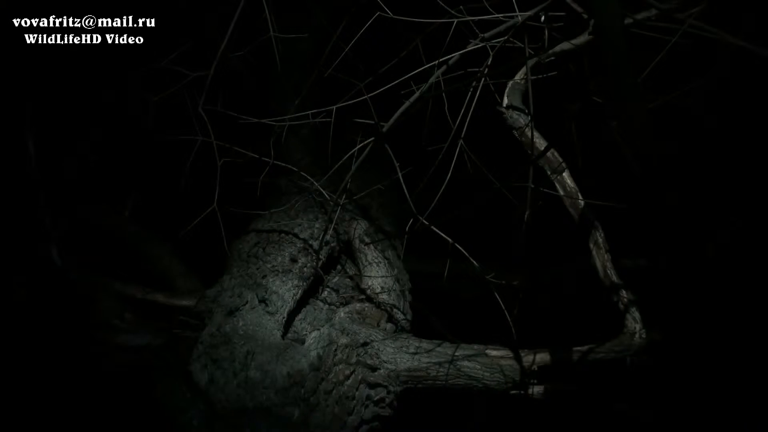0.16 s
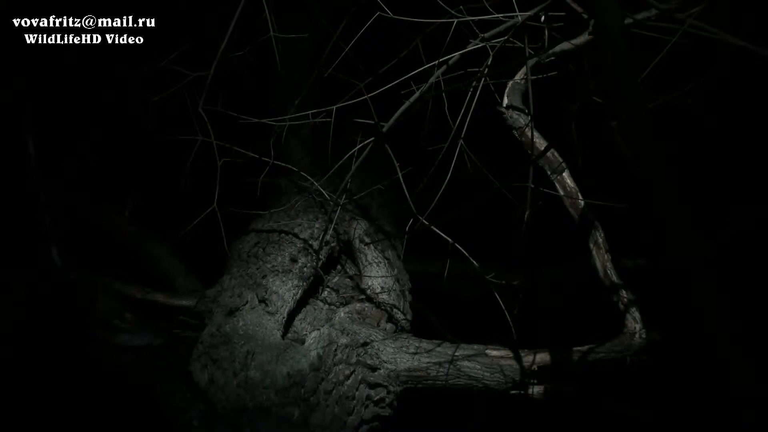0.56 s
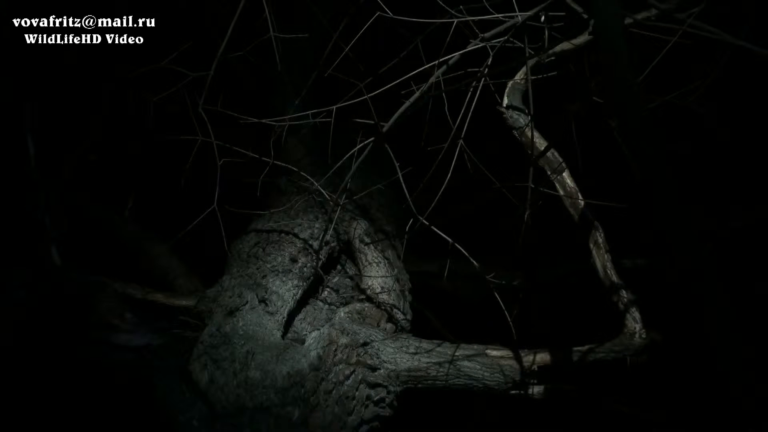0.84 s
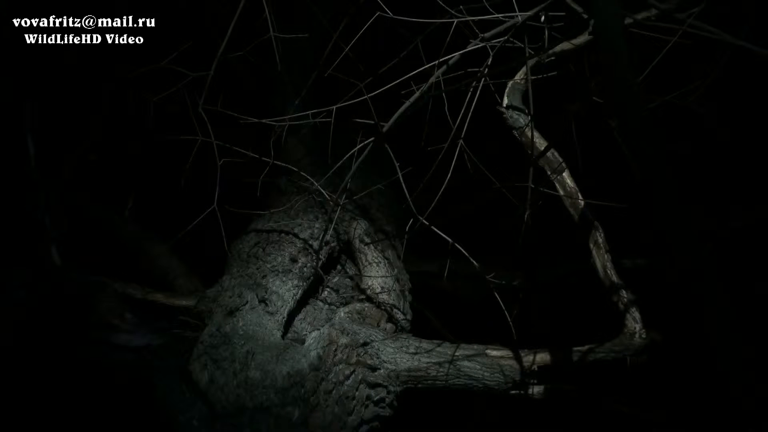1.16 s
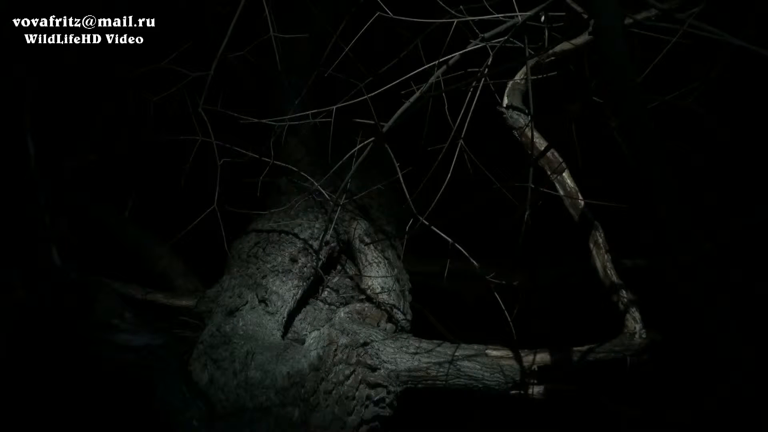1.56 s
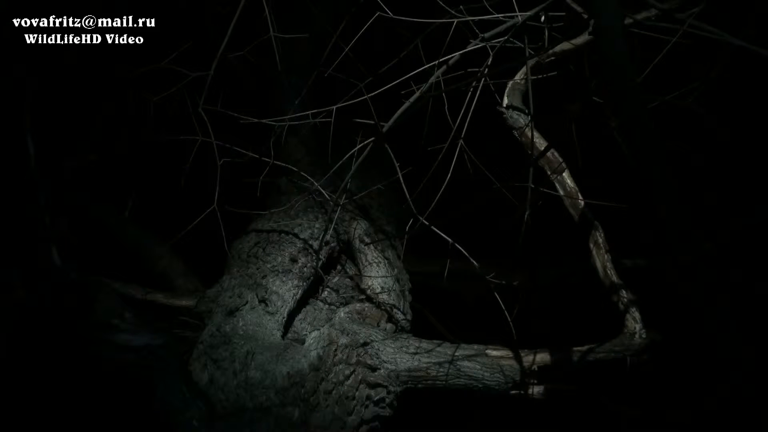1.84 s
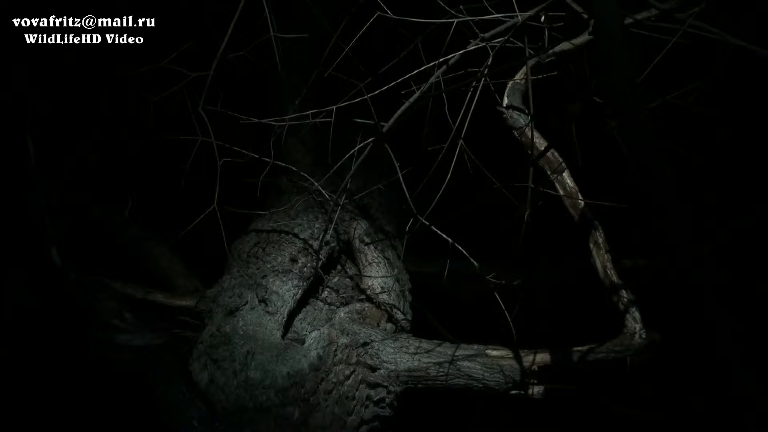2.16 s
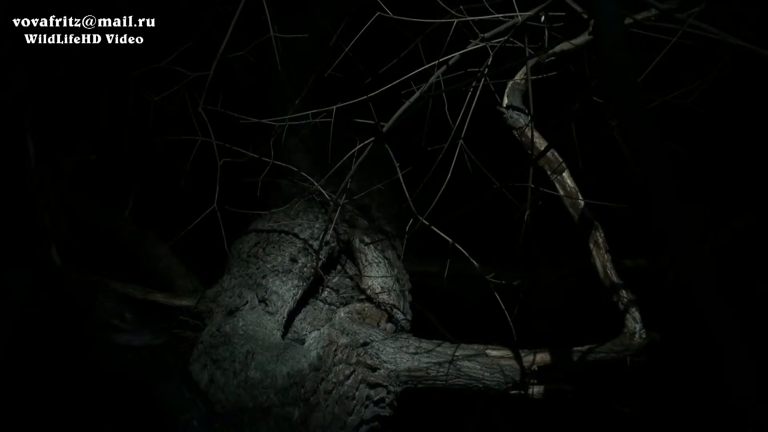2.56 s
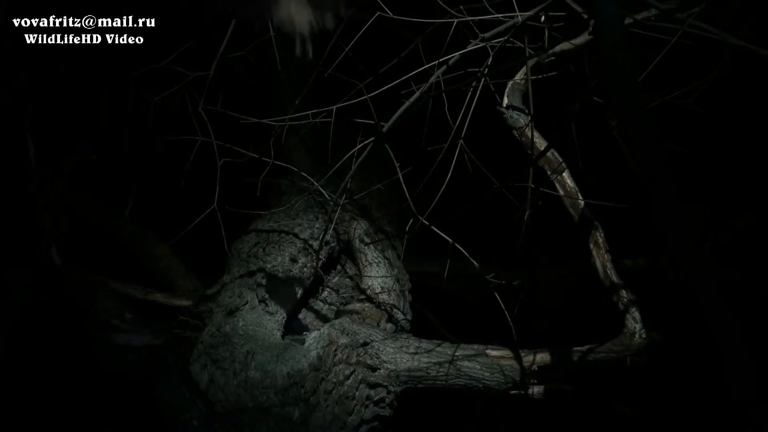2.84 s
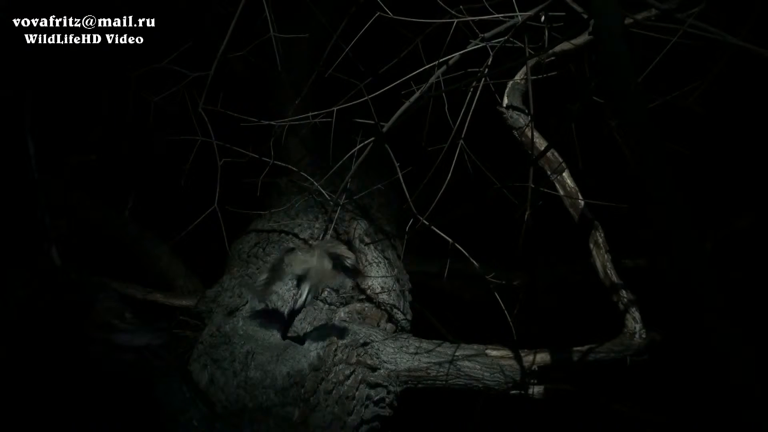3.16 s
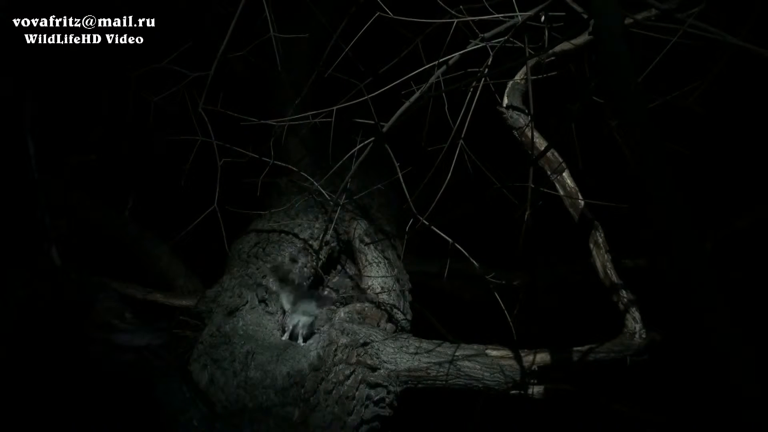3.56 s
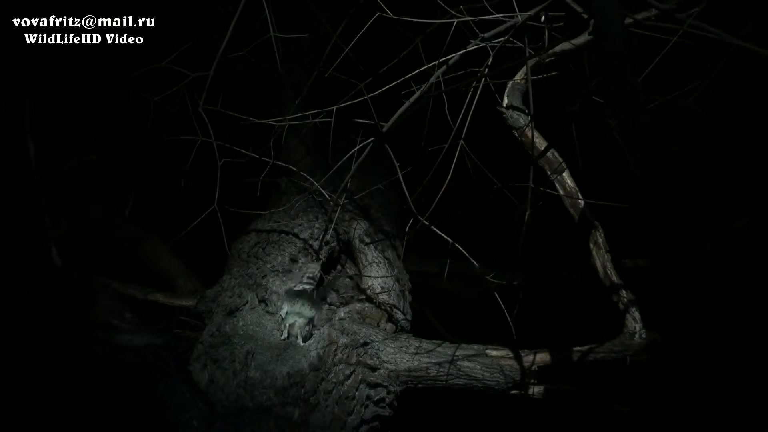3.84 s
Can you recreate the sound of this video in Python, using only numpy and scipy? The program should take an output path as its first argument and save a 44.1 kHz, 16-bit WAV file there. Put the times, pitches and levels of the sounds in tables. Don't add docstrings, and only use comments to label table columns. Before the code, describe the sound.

Owl ke-wick calls, one far and one near, with high whistled squeaks in a quiet night wood.

```python
import sys
import numpy as np
from scipy import signal
from scipy.fft import rfft, irfft, next_fast_len
from scipy.io import wavfile
from scipy.ndimage import uniform_filter1d, map_coordinates

SR = 44100
rng = np.random.default_rng(int(sys.argv[2]) if len(sys.argv) > 2 else 0)


def master(y):
    cut = np.clip(np.atleast_2d(y).T, -1, 1)
    pcm = np.round(cut * 32767)
    wavfile.write(sys.argv[1], SR, pcm.astype(np.int16))


def to_linear_factor(level_db):
    exponent = np.asarray(level_db, float) / 20
    return 10 ** exponent


N = 176400

# (time [s], pitch [Hz], level [dB], beak opening [0 shut, 1 open, may go beyond], hoarseness [0-1])
KE_FAR = [(.36, 978, -61, -.3, 0.74), (.38, 957, -69, -.3, 0.7), (.44, 982.6, -67.5, -.4, 0.93),
          (0.494, 1004, -63, -.3, 0.75)]
WICK_FAR = [(0.506, 1133, -52.5, 0.68, .1), (0.531, 1196, -53, .9, .05), (.56, 1269, -56.5, .9, .05),
            (0.579, 1334, -50, 0.73, .05), (.592, 1257, -57.5, 1.2, .1), (0.604, 1122, -47, 0.98, 0.05),
            (0.616, 1142, -57, 1.1, .1), (.625, 1110, -80, 1.1, .1)]
KE_NEAR = [(2.4705, 1260, -70, 1.1, .1), (2.4735, 1175, -46, 1.15, 0.06), (2.491, 1240, -48, 1.1, 0.12),
           (2.5, 1030, -50, 0.15, 0.08), (2.529, 990, -52.5, 0.05, 0.1), (2.552, 915, -50.5, 0.03, .12),
           (2.593, 975, -51, .1, .3), (2.635, 1051, -48, 0.34, 0.75), (2.651, 1160, -42, 0.5, 0.41)]
WICK_NEAR = [(2.661, 1055, -41.5, 1, 0.14), (2.667, 1164, -36.5, 0.58, 0.1), (2.68, 1268, -41.5, 1.5, .05),
             (2.714, 1328, -39.5, 1.6, 0.018), (2.733, 1264, -40.5, 1.25, 0.073),
             (2.743, 1165, -40.5, 0.91, 0.054), (2.755, 1083, -40, 0.35, 0.066)]
CATCH_NEAR = [(2.763, 1130, -47, 0.64, 0.33), (2.776, 1180, -42, 0.56, 0.21), (2.782, 1230, -68, .3, 0.33),
              (2.795, 1166, -75, .2, .4)]
KE_LAST = [(3.791, 986, -82, -.5, .6), (3.812, 922.7, -64.5, -0.54, 1), (3.91, 930, -63, -.5, 1),
           (4.0, 989, -68, -0.54, .6)]
# (left over right [dB], left lag [us], overtone loss [dB per octave])
OWL_PLACE = [
    (8, -36, -2.5),
    (4, 18.5, 0),
    (4, 46, -2),
]
# (frequency [Hz], gain [dB])
LEAVES = [
    [(1200, 0), (2400, 4), (3700, 0), (4600, -1), (5200, 8), (6300, -2), (7000, 1), (8000, 11)],
    [(1200, 0)],
    [(1200, 0)],
]
# (frequency [Hz], gain [dB])
BEAK_SHUT = [(1000, 3), (2000, -15), (3000, -10), (3900, -15), (5000, -27), (7000, -13), (8300, -20.5),
             (10000, -34)]
BEAK_OPEN = [(1200, -2.5), (2500, -7.5), (3750, -3.5), (4800, -16), (6700, -12), (7800, -18.5), (9300, -27),
             (10400, -37)]
OWL_JITTER, OWL_JITTER_HZ = 1.8, 260
FLUTTER_HZ, FLUTTER_DB, RASP_DB = 165, 2.5, 6.5

# (time [s], pitch [Hz], level [dB], hoarseness [0-1])
SQUEAK_A = [(.985, 7420, -82, .4), (.995, 7530, -71, .3), (1.01, 7075, -73, 0.5), (1.035, 7400, -66.5, 0.5),
            (1.09, 7350, -74, .5), (1.125, 6770, -76, .5), (1.17, 7300, -73.5, .5)]
SQUEAK_B = [(1.908, 6900, -72, .15), (1.922, 6650, -57, .1), (1.944, 5800, -55, .12),
            (1.958, 5600, -72, .6), (2.0, 5450, -68, .5), (2.018, 5850, -56, .2), (2.05, 7000, -57, .25),
            (2.074, 7550, -57, .35), (2.1, 6100, -62, .4)]
SQUEAK_C = [(3.425, 7250, -67, .2), (3.448, 6600, -57, .2), (3.475, 5750, -62, .3), (3.505, 5400, -63, .45),
            (3.545, 5800, -58, 0.25), (3.575, 6800, -54, .1), (3.6, 6850, -56, .05), (3.615, 6880, -63, .1),
            (3.63, 6900, -89, .1)]
# (time [s], level [dB], top pitch [Hz], hold level [dB])
CHIPS = [
    (.828, -78, 7300, -95),
    (1.812, -62, 7200, -76),
    (3.334, -56, 7500, -71),
]
FLICK_S, FLICK_DROP, CHIP_HOLD_S = .018, .7, .07
# (start [s], peak [s], end [s], pitch [Hz], peak level [dB])
HELD = [
    (1.94, 2.095, 2.28, 7050, -60),
    (3.46, 3.6, 3.7, 6880, -61),
]
HELD_HOARSE = [.75, .15]
HELD_RISE = [.955, 1.02]
HELD_START_DB, HELD_END_DB = -9, -12
# (frequency [Hz], gain [dB])
WHEEZE = [(1800, -30), (3100, 0), (4300, -5), (6000, 4), (7600, -3), (9000, -30)]
WHEEZE_DB, UNDERTONE_DB, SQUEAK_PAN_DB = -7.5, -6, -.5
SQUEAK_JITTER, SQUEAK_JITTER_HZ = 1.8, 600

# (time [s], level [dB])
TICKS = [
    (2.989, -58),
    (3.732, -62),
    (3.804, -58.5),
]
# (frequency [Hz], gain [dB])
BARK = [(500, 2), (2000, 11), (7000, 6), (14000, -7.5)]
TICK_S = 0.035

# (delay [s], level [dB])
GROUND = [(.004, -14), (.009, -10), (.016, -16)]
# (frequency [Hz], t60 [s])
WOOD = [(800, 0.6), (3000, 0.6), (8000, 0.26)]
OWL_WET_DB, SQUEAK_WET_DB = -13, -6

# (frequency [Hz], density [dB per Hz])
TRAFFIC = [(12, -55), (20, 8.5), (38, -4), (54, -13), (91, 1.5), (134, -11), (157, -11), (193, -11),
           (300, -11), (390, -24), (660, -120)]
ROLL = [(10, -23), (22, -1), (40, -10), (58, -20), (90, -120)]
AIR = [(120, -10.5), (200, -11.5), (414, -3.5), (497, -5), (875, -3.5), (1070, -6), (1850, -10.5),
       (2050, -14.5), (3050, -18.5), (11000, -31), (15600, -33)]
TRAFFIC_DB, ROLL_DB, AIR_DB, ROLL_GROWTH = -51.5, -59.5, -51.5, 3.5
# (frequency [Hz], correlation [-1 to 1])
ALIKE = [(30, 0.98), (130, 0.79), (290, 0.62), (640, 0.41), (1410, -0.26), (3100, -0.21), (10500, -0.074),
         (11500, 0.15)]
# (frequency [Hz], left over right [dB])
LEAN = [(30, 4.5), (80, -1.5), (200, 0), (700, 2.5), (1300, 1), (2400, -.5), (8000, -0.5)]
# (start [s], peak it heads for [s], stop [s], pitch [Hz],
# level [dB])
DRONE = (0.23, 2.7, 2.5, 163.5, -59)

START_S, FADE_S, SIDE_TOP_HZ = 0.33, 0.038, 11300


def owl():
    out = np.zeros((2, N))
    k = np.arange(1, 13)[:, None]
    upper = np.minimum(k / 3, 1)
    calls = [KE_FAR + WICK_FAR, KE_NEAR + WICK_NEAR + CATCH_NEAR, KE_LAST]
    for rows, (pan_db, lag_us, dull_db), leaves in zip(calls, OWL_PLACE, LEAVES):
        at, (hz, db, beak, hoarse) = note(rows)
        hoarse = np.clip(hoarse, 0, 1)

        def shake(rate_hz):
            return wobble(rate_hz, size=len(at))

        def each(rate_hz):
            return np.array([shake(rate_hz) for _ in k])

        phase = 2 * np.pi * np.cumsum(hz) / SR + OWL_JITTER * hoarse * shake(OWL_JITTER_HZ) / 3
        flutter = np.sin(2 * np.pi * FLUTTER_HZ * at / SR + 1.5 * shake(40))
        shut_db = along(BEAK_SHUT, k * hz)
        beak_db = shut_db + beak * (along(BEAK_OPEN, k * hz) - shut_db)
        colour_db = along(leaves, k * hz) + dull_db * np.log2(k) + beak_db
        waver_db = upper * (FLUTTER_DB * hoarse * flutter + (1.2 + 2 * hoarse) * each(70))
        sizes = to_linear_factor(db + 3 + colour_db + waver_db + 3 * hoarse * shake(35))
        rasp = to_linear_factor(RASP_DB) * hoarse * upper * each(1100)
        tone = 1 - hoarse * (k > 1) / 2
        x = np.zeros(N)
        x[at] = np.sum(sizes * (tone + rasp) * np.sin(k * phase + rng.uniform(0, 7.8, k.shape)), 0)
        out += placed(x, pan_db, lag_us * 1e-6) + to_linear_factor(OWL_WET_DB) * wood(x)
    return out


def chip(s, db, hz, hold_db):
    top_s = s + FLICK_S
    return [(s, hz * FLICK_DROP, db - 9, .9), (s + FLICK_S * .6, hz * .92, db, .9),
            (top_s, hz, hold_db, .5), (top_s + CHIP_HOLD_S, hz, hold_db - 2, .5)]


def held_voice(place, hoarse, rise):
    start, peak, end, hz, db = place
    return [(start, hz * rise, db + HELD_START_DB, .75), (peak, hz, db, hoarse),
            (end, hz, db + HELD_END_DB, hoarse * .8)]


def squeaks():
    chips = [chip(*row) for row in CHIPS]
    held = [held_voice(*each) for each in zip(HELD, HELD_HOARSE, HELD_RISE)]
    wheeze = unit(filtered(rng.standard_normal(N), lambda f: to_linear_factor(along(WHEEZE, f))))
    out = np.zeros((2, N))
    for rows in held + [SQUEAK_A, SQUEAK_B, SQUEAK_C] + chips:
        at, (hz, db, hoarse) = note(rows)
        hoarse = np.clip(hoarse, 0, 1)

        def shake(rate_hz):
            return wobble(rate_hz, size=len(at))

        phase = 2 * np.pi * np.cumsum(hz) / SR
        whistle = np.sin(phase + SQUEAK_JITTER * hoarse * shake(SQUEAK_JITTER_HZ))
        if rows in held:
            rising = at < rows[1][0] * SR
            whistle += to_linear_factor(UNDERTONE_DB) * rising * (.5 + shake(223)) * np.sin(phase / 2)
        x = np.zeros(N)
        x[at] = to_linear_factor(db + 3 + (1.5 + 2 * hoarse) * shake(120)) * whistle
        x[at] += to_linear_factor(uniform_filter1d(db, size=1500) + WHEEZE_DB) * wheeze[at]
        out += placed(x, SQUEAK_PAN_DB) + to_linear_factor(SQUEAK_WET_DB) * wood(x)
    return out


def ticks():
    x, t = np.zeros(N), np.arange(3000) / SR
    for s, db in TICKS:
        x[round(s * SR):][:len(t)] += to_linear_factor(db - 60 * t / TICK_S) * rng.standard_normal(len(t))
    return placed(filtered(x, lambda f: to_linear_factor(along(BARK, f))), 0)


def placed(x, pan_db, lag_s=0.):
    sides = np.array([[1], [-1]])

    def response(f):
        echoes = 1 + sum(to_linear_factor(db) * np.exp(-2j * np.pi * f * s) for s, db in GROUND)
        return echoes * to_linear_factor(sides * pan_db / 2) * np.exp(-1j * np.pi * f * lag_s * sides)

    return filtered(x, response)


def wood(x):
    hz, t, z = signal.stft(rng.standard_normal((2, SR // 2)), SR, nperseg=256)
    decay = to_linear_factor(-60 * t / along(WOOD, hz)[:, None])
    tail = signal.istft(z * decay, SR, nperseg=256)[1]
    late = np.pad(x, (300, 0))[None]
    return signal.fftconvolve(late, tail / np.linalg.norm(tail[0]), axes=1)[:, :N]


def night():
    t = np.arange(N) / SR
    rumble = to_linear_factor(TRAFFIC_DB + .5 * wobble(1.5)) * rush(TRAFFIC, patchy_db=.5)
    roll_db = ROLL_DB + ROLL_GROWTH * (t - 2) + 1.2 * wobble(6.6)
    roll = to_linear_factor(roll_db) * rush(ROLL, patchy_db=.5)
    start, peak, end, hz, db = DRONE
    swell = np.interp(t, [start, peak, end], [0, 1, 0]) ** .5
    drone = to_linear_factor(db + 3 * wobble(11.95)) * swell * np.sin(2 * np.pi * hz * t + .8 * wobble(13))
    air = to_linear_factor(AIR_DB + .3 * wobble(1.2)) * rush(AIR, patchy_db=.7)
    return rumble + roll + drone + air


def rush(spectrum, patchy_db):
    z = signal.stft(rng.standard_normal((2, N)), nperseg=512)[2]
    field = uniform_filter1d(rng.standard_normal(z.shape[1:]), size=6, axis=0)
    field = uniform_filter1d(field, size=14, axis=1)
    pair = signal.istft(z * to_linear_factor(patchy_db * unit(field)), nperseg=512)[1][:, :N]

    def response(f):
        angle = np.arccos(np.clip(along(ALIKE, f), -1, 1)) / 2
        return to_linear_factor(along(spectrum, f)) * [np.cos(angle), np.sin(angle)]

    mid, side = filtered(pair, response)
    both = np.array([mid + side, mid - side])
    both = filtered(both, lambda f: to_linear_factor(along(LEAN, f) * [[.5], [-.5]]))
    return both / np.std(both.mean(0))


def unit(x):
    return x / np.sqrt(np.mean(x ** 2) + 1e-20)


def along(points, hz):
    f, v = np.transpose(points)
    return np.interp(np.log(hz + 1), np.log(f + 1), v)


def wobble(rate_hz, size=N):
    return map_coordinates(rng.standard_normal(size // 8 + 9), [np.arange(size) * rate_hz / SR + 2])


def filtered(x, response):
    m = next_fast_len(N + 8192)
    return irfft(rfft(x, m) * response(np.fft.rfftfreq(m, 1 / SR)), m)[..., :N]


def note(rows):
    s, *cols = np.transpose(rows)
    at = np.arange(round(s[0] * SR), min(round(s[-1] * SR), N))
    return at, [uniform_filter1d(np.interp(at / SR, s, c), size=90) for c in cols]


def scene():
    return owl() + squeaks() + ticks() + night()


def low_pass(x):
    return signal.sosfilt(signal.butter(12, 15710, fs=SR, output="sos"), x)


def record(dry):
    fade = np.clip((np.arange(N) / SR - START_S) / FADE_S, 0, 1) ** 1.43
    mid = dry.mean(0)
    side = filtered((dry[0] - dry[1]) / 2, lambda f: f < SIDE_TOP_HZ)
    return low_pass(np.array([mid + side, mid - side]) * fade)


dry = scene()
out = record(dry)
master(out)
```